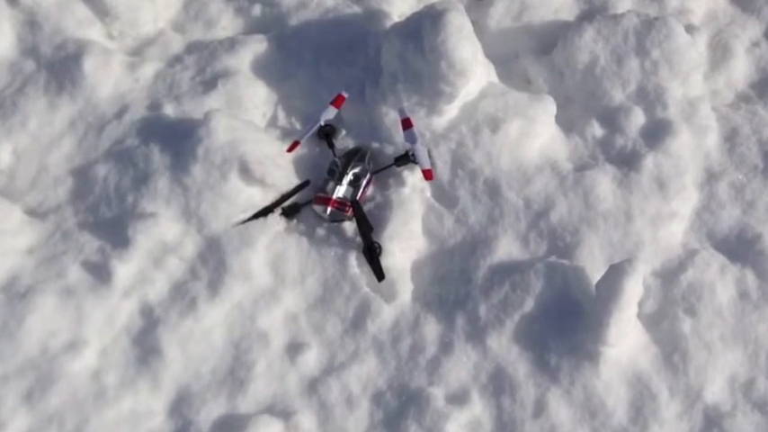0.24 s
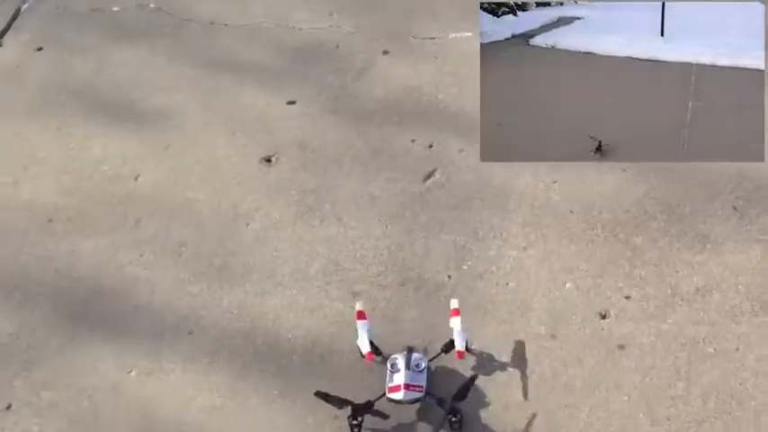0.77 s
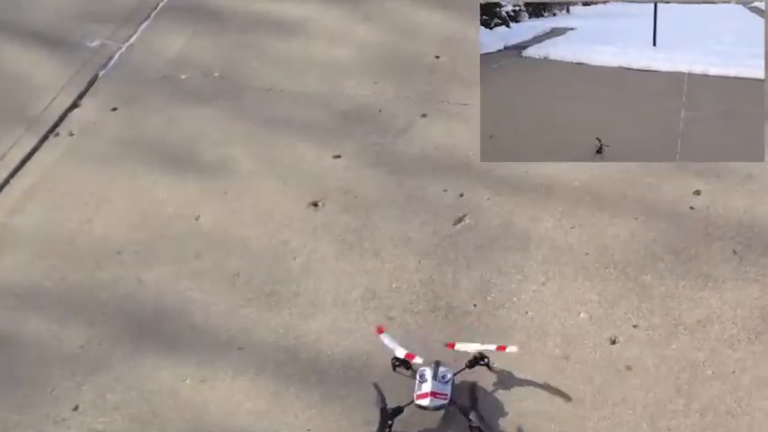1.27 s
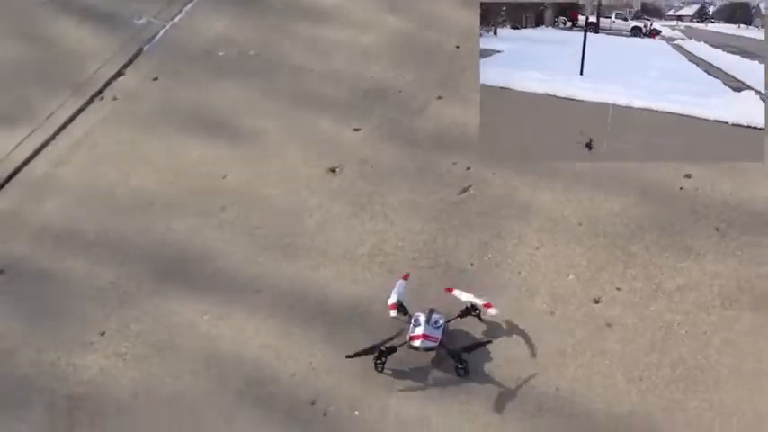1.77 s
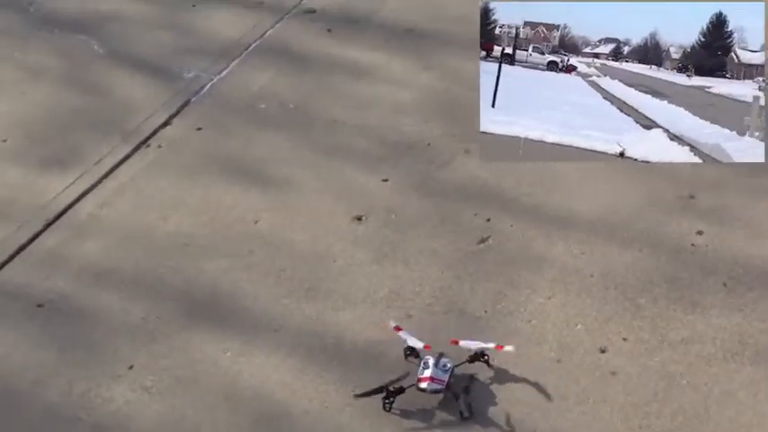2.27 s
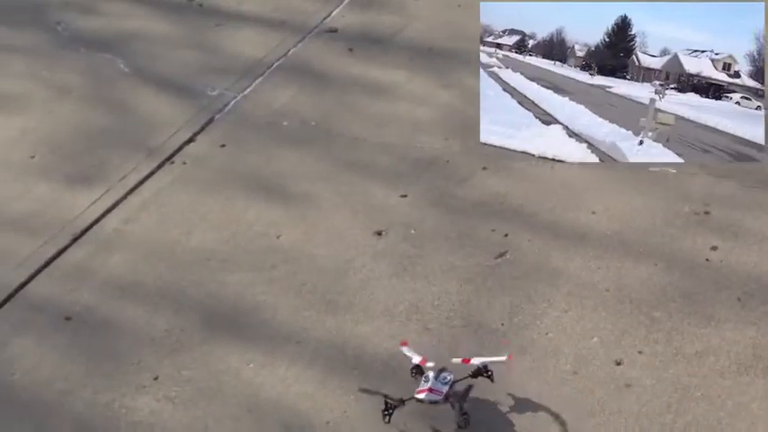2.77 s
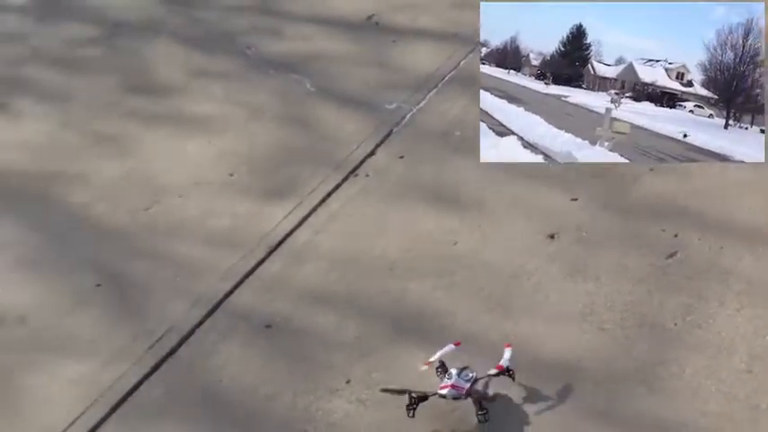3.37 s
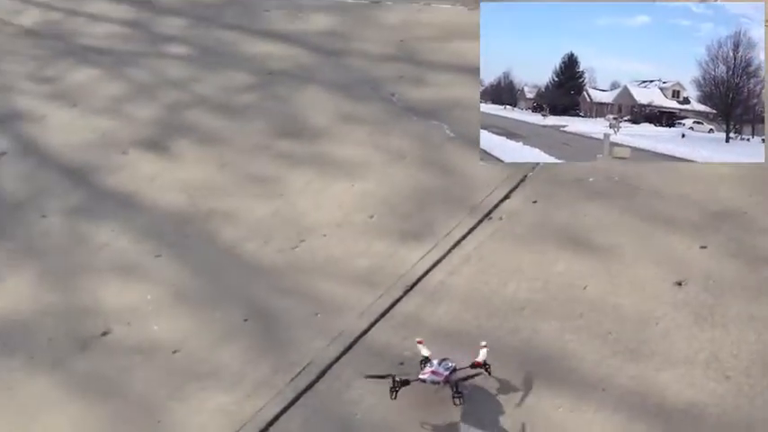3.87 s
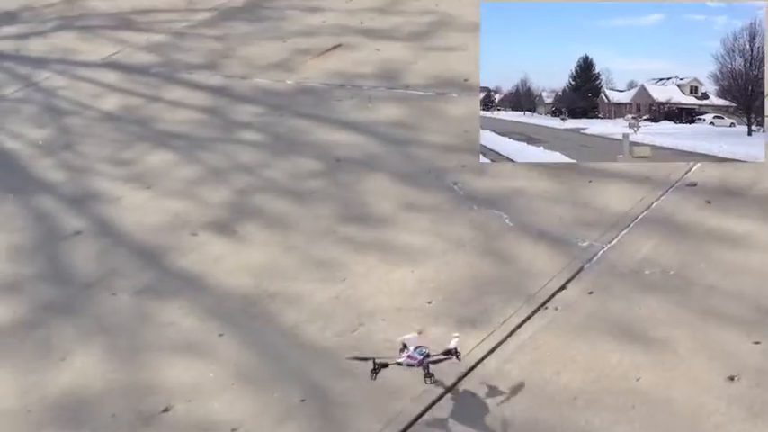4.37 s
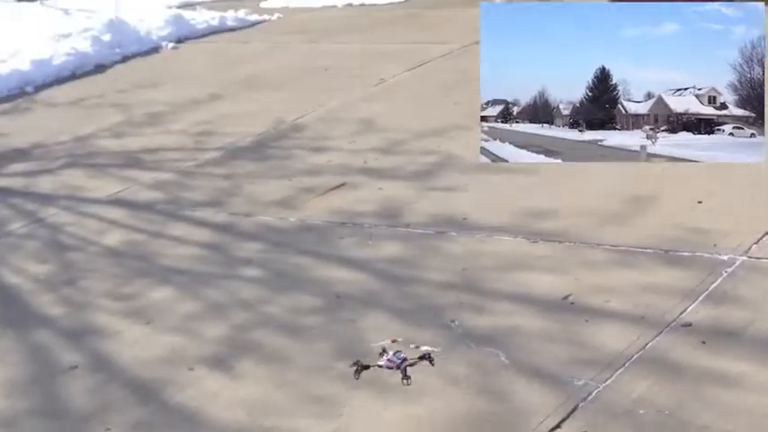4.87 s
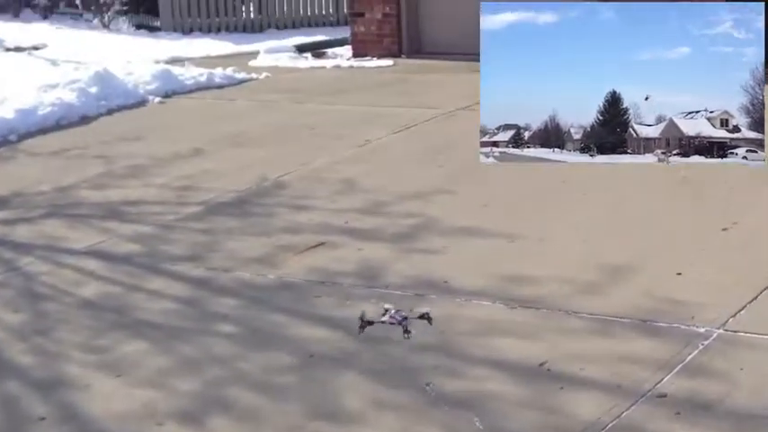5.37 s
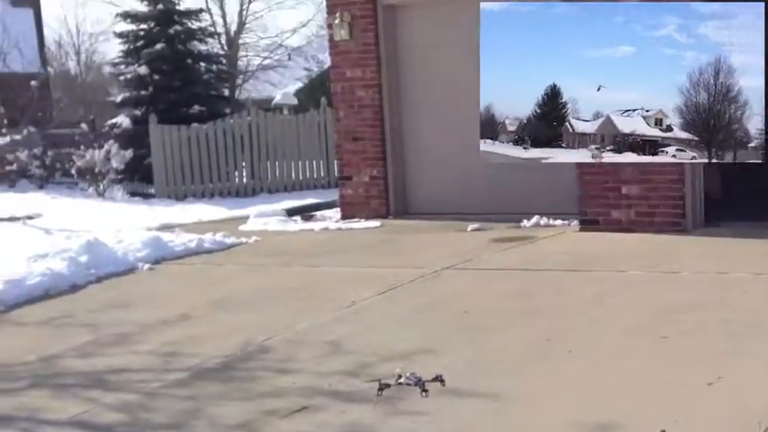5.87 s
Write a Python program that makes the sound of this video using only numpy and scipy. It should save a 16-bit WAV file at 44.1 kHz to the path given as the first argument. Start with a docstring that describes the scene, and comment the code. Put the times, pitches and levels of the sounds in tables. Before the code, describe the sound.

The first 0.3 seconds are silent, then a very faint outdoor street hush and low air rumble fade in, with a tiny scuff near 0.4 and soft grit ticks until 0.7. At about 0.8 a small quadcopter starts: a thin, piercing whistle near 8 kHz snaps on, motors whine up in pitch, and propeller hiss swells to full by 1.2. Loud, short, gritty shoe crunches come at about 1.15, 1.8 and 2.4 over the steady bright, lightly fluttering hiss. From 2.3 to 2.9 the throttle opens; the whistle weakens and wavers, while nasal whines and airy resonances thicken. Small hollow ticks fall near 3.3 and, clearer, 4.26. From about 3.8 it lifts off the concrete; the hiss takes on a sweeping hollow colour and becomes quieter by 5, continuing steadily with brief gliding whines until the end at 6.1.

```python
"""Quiet street, concrete drive: after a fade-in, a small quadcopter starts and lifts off.
The motor drive whistles at its switching rate; geared motors whine as bands of smeared tones.
Propeller noise is shaped hiss, throbbing with the blades, plus two housing resonances under load.
A delayed, inverted ground bounce sweeps during the climb. Steps crunch as dying low grains and grit;
a scraped hollow part ticks by ringing its modes; the street is faint shaped noise and a low rumble."""
import sys
import numpy as np
from scipy import signal
from scipy.io import wavfile
from scipy.ndimage import uniform_filter1d

SR = 44100
rng = np.random.default_rng(int(sys.argv[2]) if len(sys.argv) > 2 else 0)


def waveform_to_disk(signal):
    """Save audio, clipped to [-1, 1], as 16-bit WAV at the path in sys.argv[1]."""
    frames = np.transpose(np.atleast_2d(signal))
    scaled = np.clip(frames, -1, 1) * 32767
    samples = np.round(scaled).astype(np.int16)
    wavfile.write(sys.argv[1], SR, samples)


def gain_from_db(level_db):
    """Turn a decibel level (scalar or array-like) into a linear amplitude factor."""
    decades = np.asarray(level_db, float) / 20
    return 10 ** decades


N = 270333
T = np.arange(N) / SR

# Motor drive switching rate: time_s, switching_hz
SWITCH_HZ = [(.8, 7954), (1.7, 7955), (2.75, 7969), (3.0, 7968), (3.5, 7955), (4.1, 7946), (4.8, 7938),
             (5.2, 7952), (6.13, 7964)]
# Whistle; the four drives beat and turn with the craft: time_s, level_db
WHISTLE_DB = [(.8, -16.5), (.9, -13), (1.02, -16.5), (2.73, -23), (2.79, -34), (2.85, -21), (2.98, -18),
              (3.1, -28), (3.26, -17), (3.34, -25), (3.65, -20), (4.09, -24), (4.21, -38), (4.31, -25),
              (4.44, -34), (4.5, -29), (5.2, -36), (6.13, -31)]
# Tone at half the switching rate: time_s, level_db
HALF_TONE = [(.79, -41), (1.0, -44), (2.8, -34), (3.1, -29), (3.35, -36), (4.2, -36), (4.45, -31),
             (4.9, -32), (5.03, -41), (5.28, -28), (5.5, -36), (6.13, -33)]
# Tone at three halves of the switching rate: time_s, level_db
UPPER_TONE = [(.79, -37), (.95, -35), (1.4, -45), (2.5, -44), (2.85, -31), (3.3, -37), (3.6, -46),
              (6.13, -48)]
# Propeller wash: time_s, level_db
WASH = [(.8, -34), (.84, -32), (.9, -26.5), (1.1, -20), (1.16, -15.5), (1.42, -17.5), (3.47, -16.5),
        (4.23, -18.5), (4.96, -23), (6.13, -24)]
# Wash spectrum on the ground, relative: frequency_hz, density_db_per_hz
WASH_GROUND = [(150, -50), (300, -13), (600, -10.5), (1100, -4), (2400, -1.5), (3200, -1.5), (5000, 0),
               (6900, -2), (9500, 1), (15300, -3)]
# Wash spectrum in the air, relative: frequency_hz, density_db_per_hz
WASH_AIR = [(150, -62), (300, -7), (600, -1.5), (1200, -9.5), (2900, -3), (5000, 2.5), (6500, 0.5),
            (9500, 2.5), (15300, 1)]
# Wash colour: time_s, air_share (0 ground, 1 air)
CLIMB = [(.8, 0.12), (2.28, 0.27), (3.47, 0.87), (4.23, 0.71), (4.96, 0.88)]
# Propeller speed: time_s, turns_per_s
PROP = [(.8, 30), (1.2, 96), (2.3, 104), (2.8, 177), (4, 178), (6.13, 170)]
# Low housing resonance under load: time_s, centre_hz, level_db
LOW_HOUSING = [(2.3, 3834, -31), (2.59, 3444, -30), (2.83, 4410, -30), (3.09, 3880, -23.5),
               (3.61, 3863, -32.5), (3.9, 3922, -27), (4.91, 4113, -27), (6.13, 4218, -27.5)]
# High housing resonance under load: time_s, centre_hz, level_db
HIGH_HOUSING = [(2.3, 12070, -29), (2.59, 11230, -24.5), (2.83, 11960, -21.5), (3.09, 11200, -27),
                (3.61, 11260, -22.5), (3.9, 11150, -27), (4.95, 11920, -26), (6.13, 12050, -28)]
# Idling motor: time_s, shaft_turns_per_s, level_db (order levels add to it)
SHAFT = [(.84, 270, -50), (.92, 278, -44), (.96, 370, -46), (1.0, 500, -50), (1.09, 578, -38),
         (1.17, 612, -30), (1.26, 630, -34), (1.5, 614, -33), (2.0, 607, -40), (2.6, 610, -41),
         (2.95, 615, -55)]
# Shaft orders: multiple, level_db
SHAFT_ORDERS = [(2, -17), (3, -9.5), (4, 2), (7.5, -7), (8, -7)]
# Short gliding motor whines, at spin-up and in flight: start_s, length_s, from_hz, to_hz, top_db
WHINES = [(0.859, 0.19, 4380, 4650, -39), (.885, 0.065, 2850, 2930, -41), (0.974, .12, 1767, 1830, -31),
          (1.098, .6, 1950, 2150, -37), (1.12, 0.24, 4780, 5080, -30), (1.17, .13, 2910, 3750, -28),
          (2.459, 0.33, 3130, 3360, -30.5), (2.681, 1.1, 4620, 4460, -36), (2.798, 0.52, 4710, 3695, -36),
          (2.92, 1, 3144, 3526, -32.5), (4.678, 0.25, 4300, 4200, -29), (5.252, 0.38, 4610, 4200, -30)]
# Single grains of grit giving way under a shoe, soft and loud: start_s, level_db, pitch_hz
CRUNCH = [(.561, -33, 312), (.702, -29, 324), (1.144, -8, 595), (1.164, -10.5, 744), (1.171, -14.5, 460),
          (1.2, -22, 320), (1.795, -2.5, 764), (1.802, -9.5, 460), (2.422, -12, 545), (2.423, -12, 300)]
# Steps: start_s, length_s, scuff_db, scuff_top_hz, small_grains_db
SCUFFS = [(0.435, 0.074, -42.5, 7000, -46), (1.12, .062, -25.5, 6000, -10.5),
          (1.794, .041, -18.5, 3700, -21), (2.383, 0.051, -22.5, 5000, -26)]
# Ticks of a small hollow part: start_s, level_db
TICKS = [(.848, -38), (3.3051, -24), (4.261, -14.5)]
# Modes of that part: frequency_hz, level_db, t60_s
TICK_MODES = [(1150, 0, .017), (1450, -8, .014), (2110, -4, .014), (2600, -7, .008), (3100, -7, .008),
              (5700, -10, .008)]
# Street spectrum, relative: frequency_hz, density_db_per_hz
STREET = [(120, -9), (300, -5.5), (600, -9), (1400, -13.5), (4300, -15), (15300, -23)]
# Low rumble of air at the microphone: time_s, level_db
RUMBLE = [(.4, -48), (1.8, -42.5), (2.2, -46), (3.0, -49.5), (3.8, -42), (4.4, -56), (4.9, -44.5),
          (6.13, -44.5)]

FIRST_ON_S, ALL_ON_S, FIRST_DB = .787, .813, -11.5  # one drive first, this much softer
SWITCH_ON_S = 0.003
SKIRT_DB = -10.5  # relative to the wash
LOAD_FROM_S, LOAD_S = 2.2, 0.36  # the throttle opens
HOUSING_EDGE_HZ = 3000  # the housing radiates little below this
GLIDE_BEND, WHINE_SKEW, WHINE_ENDS_DB = 1.5, 0.86, -5  # pitch settles on its goal; ends are softer
LIFT_S, LAG_MS_PER_S, BOUNCE_GAIN, BOUNCE_RISE_S = 3.82, .64, .45, .85
GRAIN_CYCLES, GRAIN_HZ, GRAIN_SPREAD_OCTAVES = 2.8, 786, 0.52
SNAP_DB, SNAP_HZ = -12, 2640  # snap level relative to the grain body
SCRAPE_DB = 21  # dry grit against the ring
STREET_DB = -41.5
EDGE_HZ = 15330
FADE_FROM_S, FADE_S, FADE_BEND = .33, 0.19, 1.33  # gain is a power of time


def evened(x):
    """Scales to rms 1."""
    return x / np.sqrt(np.mean(x ** 2) + 1e-20)


def curve(rows, t=T):
    """Every column of a table, joined by straight lines in time."""
    s, *columns = np.transpose(rows)
    return [np.interp(t, s, c) for c in columns]


def read(points, hz):
    """A spectrum on a log-frequency axis."""
    f, value = np.transpose(points)
    return np.interp(np.log(hz + 1), np.log(f + 1), value)


def add(mix, start_s, sound):
    """Mixes a sound in at start_s."""
    part = mix[round(start_s * SR):][:len(sound)]
    part += sound[:len(part)]


def drift(hz, n=N):
    """Slow complex random signal of power 1, about hz wide."""
    z = rng.standard_normal((n, 2)) @ [1, 1j]
    r = np.exp(-np.pi * hz / SR)
    for _ in range(2):
        z = signal.lfilter([1 - r], [1, -r], z)
    return z / np.sqrt(np.mean(abs(z) ** 2))


def tone(hz, fuzz, width_hz):
    """A tone of about rms 1 on the curve hz; the share fuzz of its power is smeared into a band."""
    fuzz = np.clip(fuzz, 0, 1)
    swing = np.sqrt(1 - fuzz) + np.sqrt(fuzz) * drift(width_hz, len(hz))
    turns = np.cumsum(hz) / SR + rng.random()
    return np.sqrt(2) * (swing * np.exp(2j * np.pi * turns)).real


def noise(field_db, patchy_db):
    """Random short-time spectra under a dB field of frequency and time, with drifting patches."""
    frames, hz = N // 256 + 5, np.fft.rfftfreq(1024, 1 / SR)[:, None]
    a, b, patches = rng.standard_normal((frames, 513, 3)).T
    patches = uniform_filter1d(patches, size=10, axis=0)
    patches = evened(uniform_filter1d(patches, size=14, axis=1))
    level_db = field_db(hz, np.arange(frames) * 256 / SR) + patchy_db * patches
    z = (a + 1j * b) * gain_from_db(level_db)
    return signal.istft(z, nperseg=1024, noverlap=768)[1][:N]


def drive():
    """Switched motor current makes the windings sing, with a faint skirt of noise."""
    hz = curve(SWITCH_HZ)[0]
    on = np.clip((T - FIRST_ON_S) / SWITCH_ON_S, 0, 1)
    alone = np.clip((ALL_ON_S - T) / SWITCH_ON_S, 0, 1)
    blur = np.interp(T, [3.9, 4.6], [.03, .45])  # air blurs it far off
    whistle = gain_from_db(curve(WHISTLE_DB)[0] + FIRST_DB * alone) * tone(hz, fuzz=blur, width_hz=37)
    half = gain_from_db(curve(HALF_TONE)[0]) * tone(hz / 2, fuzz=.45, width_hz=24)
    upper = gain_from_db(curve(UPPER_TONE)[0]) * tone(hz * 3 / 2, fuzz=0.41, width_hz=58)
    skirt = gain_from_db(curve(WASH)[0] + SKIRT_DB) * tone(hz, fuzz=0.85, width_hz=1270)
    return on * (whistle + half + upper + skirt)


def propellers():
    """Air noise: blade-chopped hiss that changes colour, and housing resonances under load."""
    hiss = gain_from_db(curve(WASH)[0]) * evened(noise(wash_colour, patchy_db=1.5))
    load = np.clip((T - LOAD_FROM_S) / LOAD_S, 0, 1)
    return (T > WASH[0][0]) * chop(depth=0.072) * (hiss + load * housing())


def wash_colour(hz, t):
    """Wash spectrum in dB, blended between its ground and air shapes."""
    climb = np.clip(curve(CLIMB, t)[0], 0, 1)
    return (1 - climb) * read(WASH_GROUND, hz) + climb * read(WASH_AIR, hz)


def housing():
    """Two housing resonances as wavering noise bands."""
    (low_hz, low_db), (high_hz, high_db) = curve(LOW_HOUSING), curve(HIGH_HOUSING)
    band = 1.6 * tone(low_hz, fuzz=1, width_hz=800)
    for off_hz in (-400, -150, 150, 401):  # one wavering strand a motor
        strand_hz = low_hz + off_hz + 70 * drift(2.5).real
        band += gain_from_db(3.0 * drift(4.0).real) * tone(strand_hz, fuzz=1, width_hz=260)
    band = signal.sosfilt(signal.butter(6, HOUSING_EDGE_HZ, "high", fs=SR, output="sos"), band)
    low = gain_from_db(low_db + 1.2 * drift(9.5).real) * evened(band)
    high = gain_from_db(high_db + 2.5 * drift(7.0).real) * tone(high_hz, fuzz=1, width_hz=1500)
    return low + high


def chop(depth):
    """Four two-bladed rotors at slightly different speeds throb the air noise."""
    out = np.ones(N)
    for trim in (.97, .99, 1.01, 1.03):
        turns_per_s = curve(PROP)[0] * (trim + 0.0118 * drift(3.05).real)
        turns = np.cumsum(turns_per_s) / SR + rng.random()
        out += depth * (np.cos(4 * np.pi * turns) + 0.74 * np.cos(2 * np.pi * turns))
    return evened(out)


def motors():
    """Shaft orders of the idling motors and short gliding whines of single motors."""
    shaft_hz, level_db = curve(SHAFT)
    idle = np.zeros(N)
    for order, db in SHAFT_ORDERS:
        for trim in (.982, 1.008):  # two motors, not quite in step
            idle += gain_from_db(db) * tone(order * trim * shaft_hz, fuzz=.92, width_hz=30 * order)
    out = gain_from_db(level_db) * idle * (T > SHAFT[0][0]) * (T < SHAFT[-1][0])
    for start_s, length_s, from_hz, to_hz, top_db in WHINES:
        u = np.linspace(0, 1, round(length_s * SR))
        hz = to_hz + (from_hz - to_hz) * (1 - u) ** GLIDE_BEND
        swell_db = WHINE_ENDS_DB * (2 * u ** WHINE_SKEW - 1) ** 2
        add(out, start_s, gain_from_db(top_db + swell_db) * tone(hz, fuzz=0.8, width_hz=140))
    return out


def ground(x):
    """A rotor pushes air down and pulls from above: the dull bounce off concrete returns inverted."""
    aloft_s = np.maximum(T - LIFT_S, 0)
    dull = signal.lfilter(*signal.butter(2, 3600, fs=SR), x)
    late = np.interp(T - LAG_MS_PER_S * aloft_s / 1000, T, dull)  # lag grows with the climb
    return x - BOUNCE_GAIN * np.minimum(aloft_s / BOUNCE_RISE_S, 1) * late


def steps(count=8):
    """Grit gives way under a shoe: low grains of a few cycles and short gritty scuffs."""
    out = np.zeros(N)
    for start_s, db, hz in CRUNCH:
        add(out, start_s, grain(db, hz))
    for start_s, length_s, scuff_db, top_hz, grains_db in SCUFFS:
        for k, (late, pitch, size) in enumerate(rng.uniform(-0.99, 1, (count, 3))):
            grain_s = start_s + length_s * (k + 1 + 0.38 * late) / (count + 1)
            hz = GRAIN_HZ * 2 ** (GRAIN_SPREAD_OCTAVES * pitch)
            add(out, grain_s, grain(grains_db + 2.3 * size, hz))
        hiss, lumps = rng.standard_normal((8000, 2))[:round(length_s * SR)].T
        grit = hiss * gain_from_db(2.5 * uniform_filter1d(lumps, size=60) * np.sqrt(60))  # uneven grains
        grit = signal.sosfilt(signal.butter(2, [450, top_hz], "band", fs=SR, output="sos"), grit)
        add(out, start_s, gain_from_db(scuff_db) * evened(grit) * signal.windows.tukey(len(grit), .5))
    return out


def grain(db, hz):
    """One low grain: a bright snap and a few dying cycles."""
    t = np.arange(0, 3 * GRAIN_CYCLES / hz, 1 / SR)
    envelope = np.minimum(hz * t / 0.39, 1) * np.exp(-2.0 * hz * t / GRAIN_CYCLES)
    body = np.sin(2 * np.pi * hz * t) * envelope
    snap = np.sin(2 * np.pi * SNAP_HZ * t) * np.exp(-t / 0.00092)
    return -gain_from_db(db) * (body + gain_from_db(SNAP_DB) * snap)


def ticks():
    """A small hollow part is scraped for a few ms: a puff of grit sets its modes ringing."""
    out, t = np.zeros(N), np.arange(1500) / SR
    ring = sum(gain_from_db(db - 60 * t / t60_s) * np.sin(2 * np.pi * hz * t) for hz, db, t60_s in TICK_MODES)
    ring[0] += gain_from_db(SCRAPE_DB)
    no_bass = signal.butter(4, 950, "high", fs=SR, output="sos")  # too small for bass
    for start_s, db in TICKS:
        scrape = rng.standard_normal(420) * np.hanning(420)
        tick = signal.sosfilt(no_bass, np.convolve(scrape, ring))
        add(out, start_s, gain_from_db(db) * evened(tick[:800]))
    return out


def street():
    """Distant traffic and air as shaped noise, and a low rumble that swells and sinks."""
    air = gain_from_db(STREET_DB) * evened(noise(lambda hz, t: read(STREET, hz), patchy_db=2.5))
    rumble_db = curve(RUMBLE)[0] + 3.6 * drift(8.1).real
    return air + gain_from_db(rumble_db) * tone(np.full(N, 190.), fuzz=1.0, width_hz=138)


def scene():
    """All sources reach one microphone; both channels are alike."""
    mono = drive() + ground(propellers() + motors()) + steps() + ticks() + street()
    return np.array([mono, mono])


def roll_off(x):
    """The treble ends steeply here."""
    return signal.sosfilt(signal.butter(12, 16460, fs=SR, output="sos"), x)


def record(dry):
    """The microphone cuts the bass; a steep band limit cuts the top; then a fade-in from silence."""
    thin = signal.sosfilt(signal.butter(2, 140, "high", fs=SR, output="sos"), dry)
    band_limit = signal.firwin(511, EDGE_HZ, window=("kaiser", 9), fs=SR)
    thin = signal.oaconvolve(thin, band_limit[None], "same")
    faded = thin * np.clip((T - FADE_FROM_S) / FADE_S, 0, 1) ** FADE_BEND
    return roll_off(faded)


dry = scene()
out = record(dry)
waveform_to_disk(out)
```